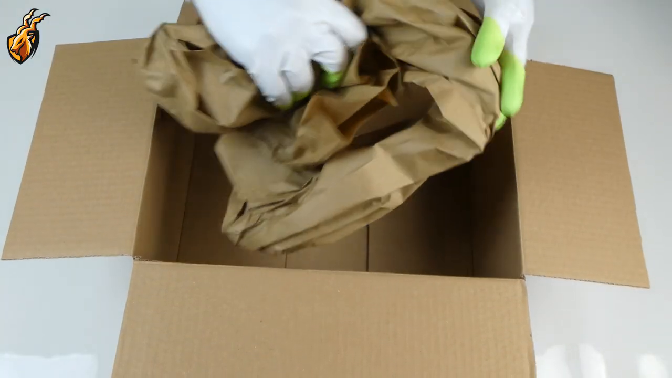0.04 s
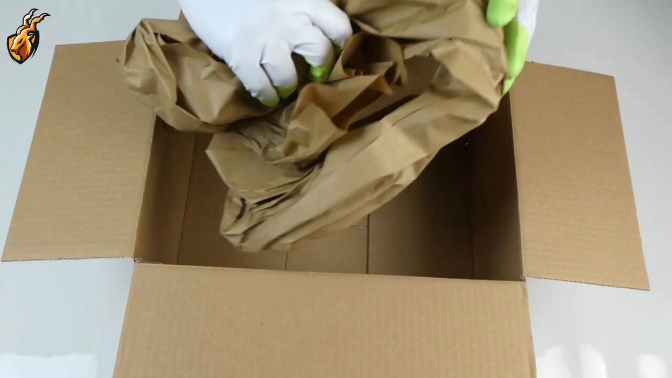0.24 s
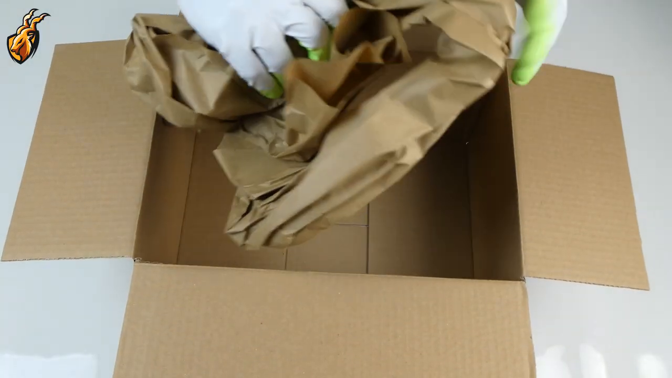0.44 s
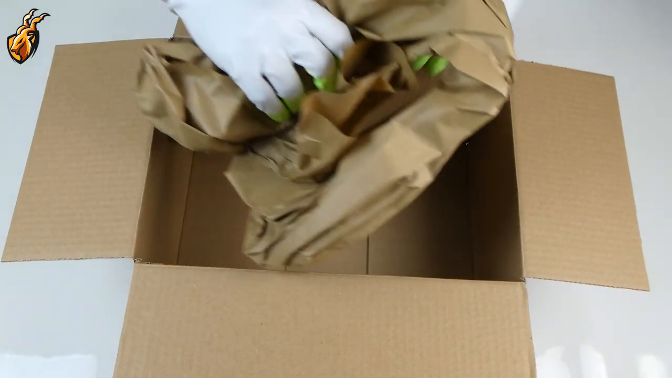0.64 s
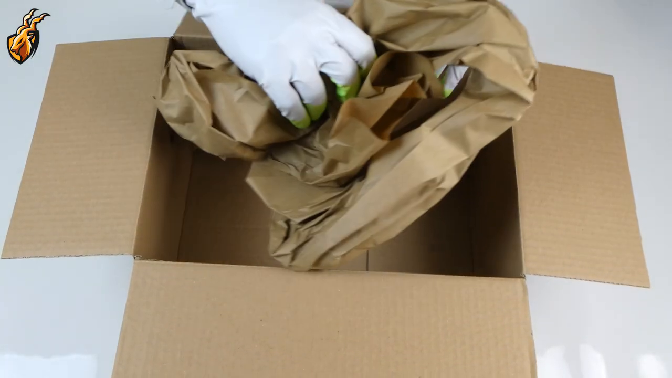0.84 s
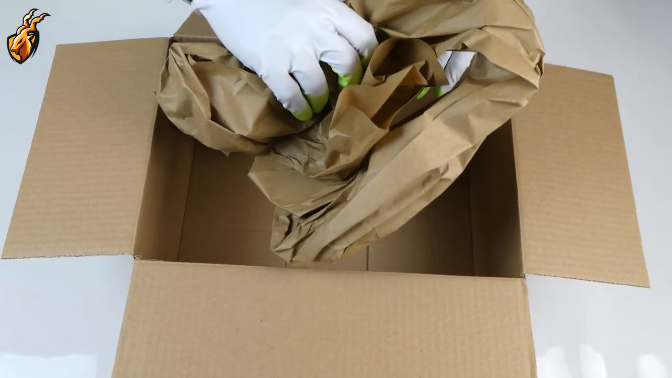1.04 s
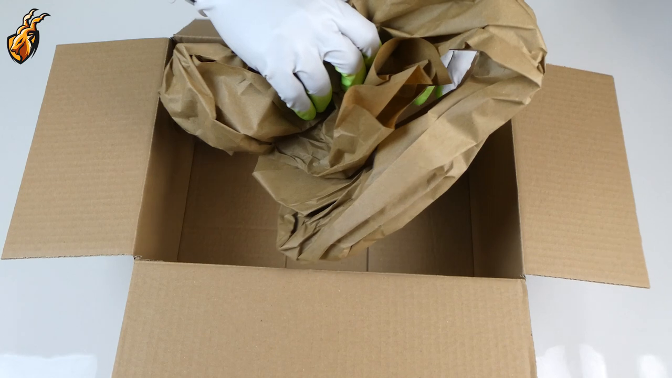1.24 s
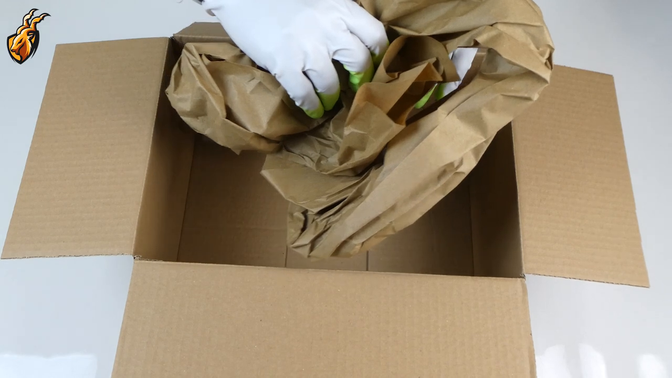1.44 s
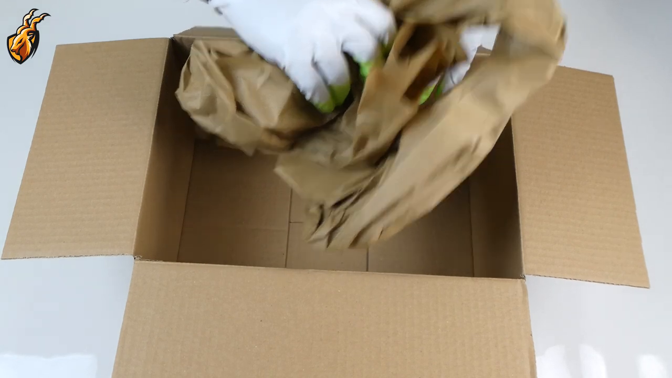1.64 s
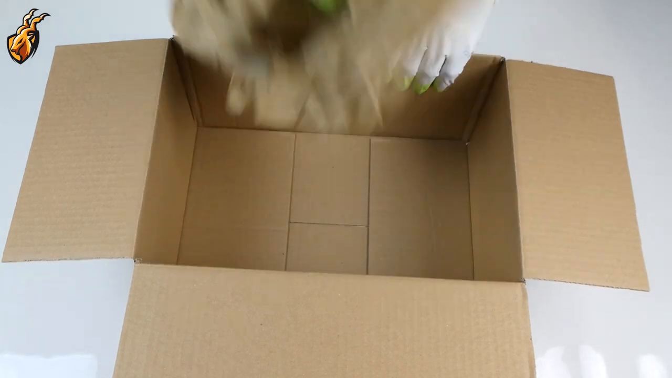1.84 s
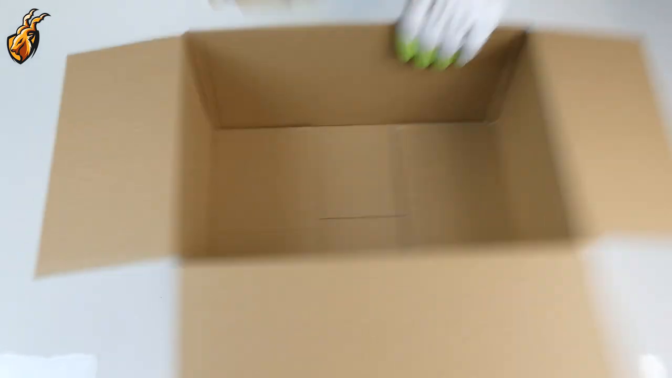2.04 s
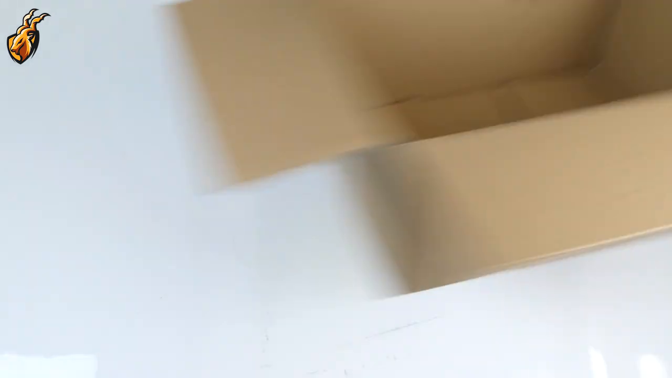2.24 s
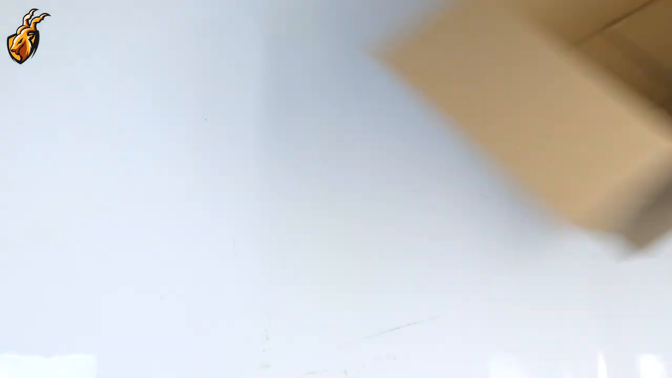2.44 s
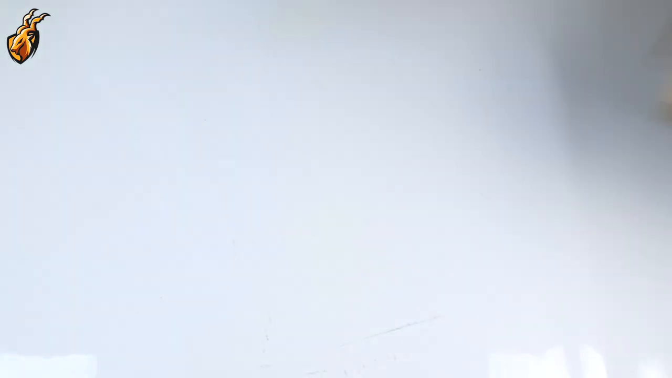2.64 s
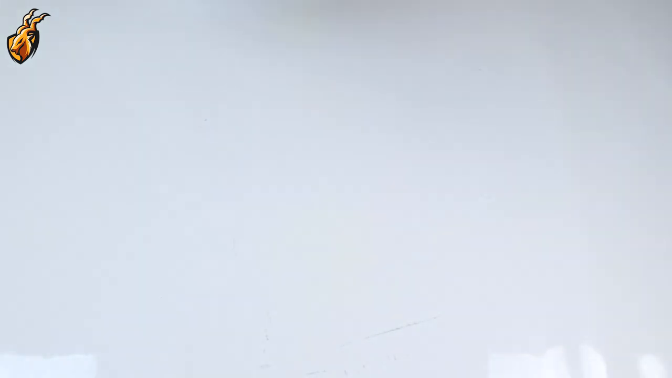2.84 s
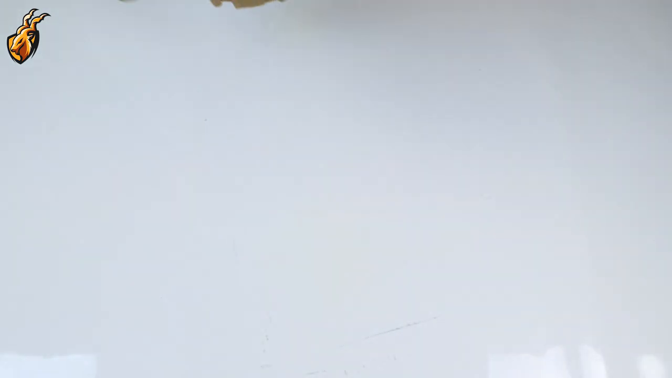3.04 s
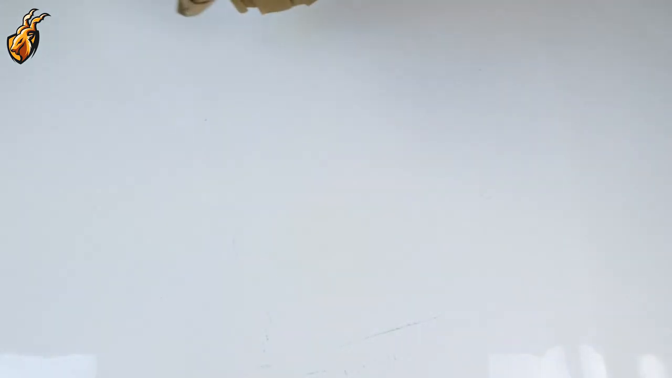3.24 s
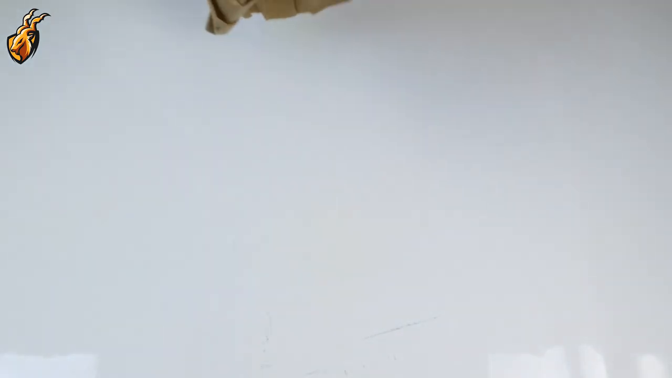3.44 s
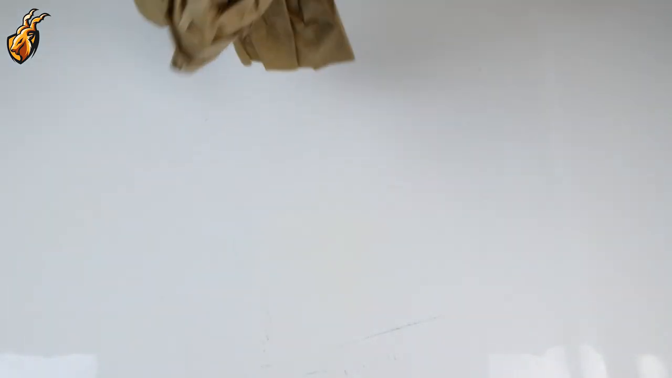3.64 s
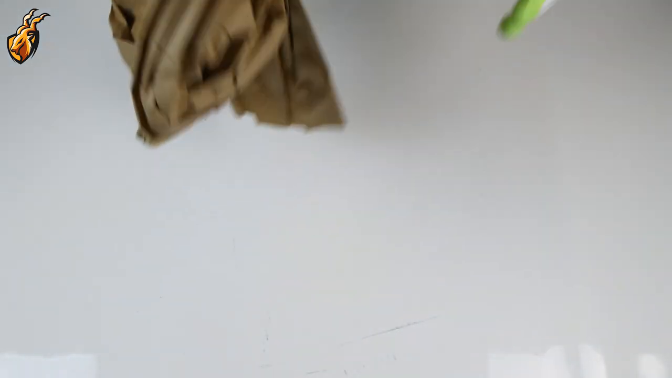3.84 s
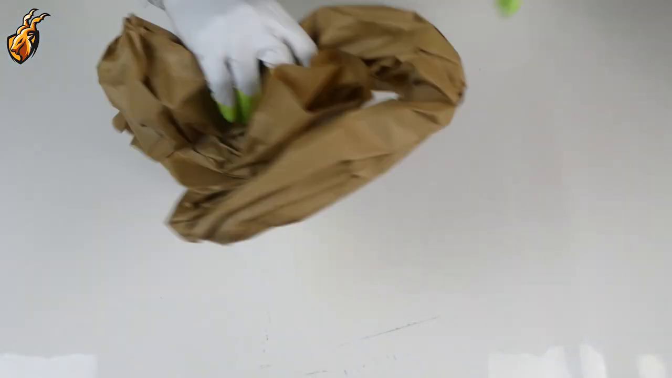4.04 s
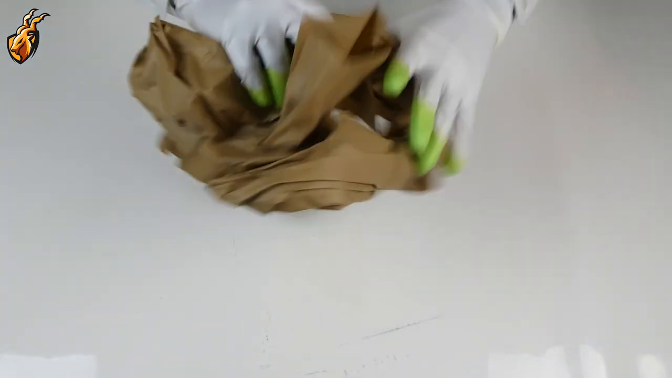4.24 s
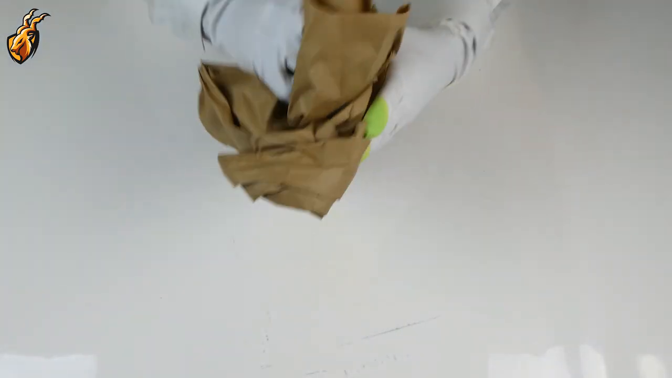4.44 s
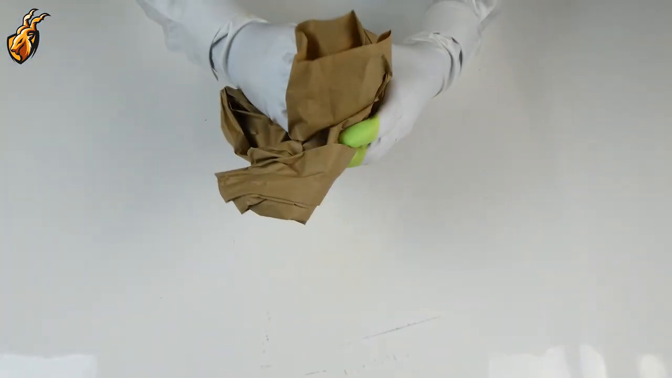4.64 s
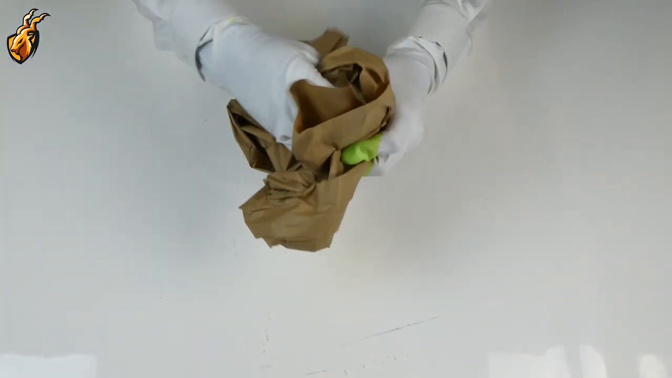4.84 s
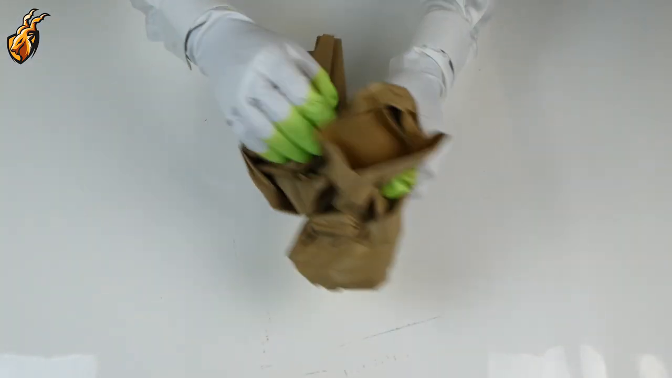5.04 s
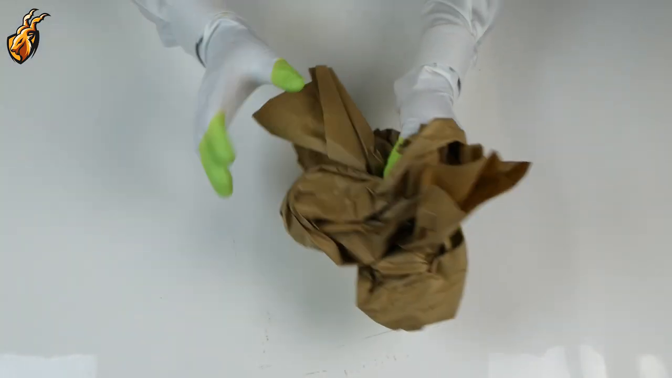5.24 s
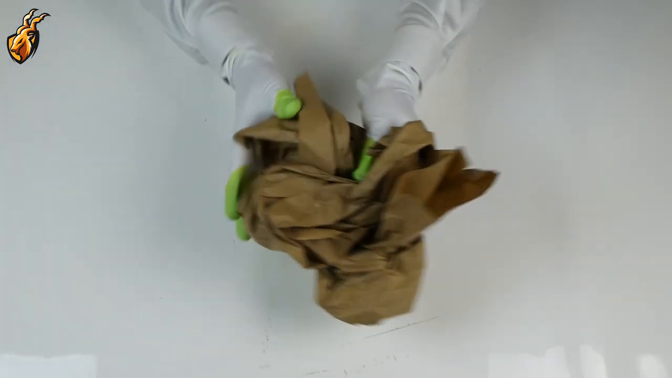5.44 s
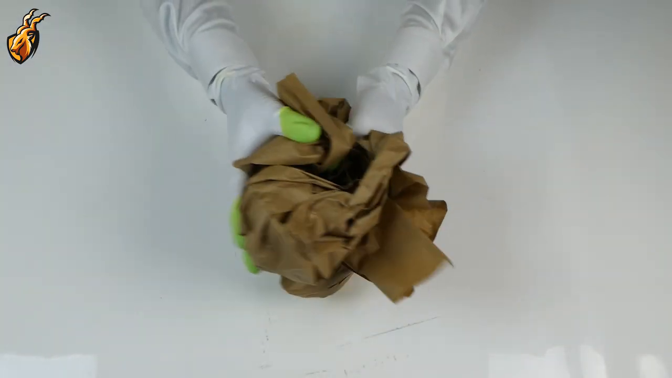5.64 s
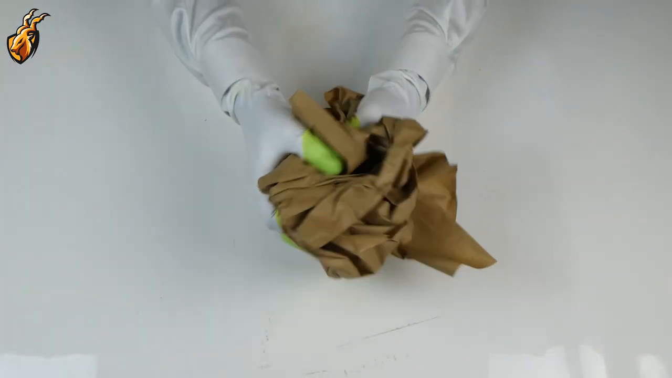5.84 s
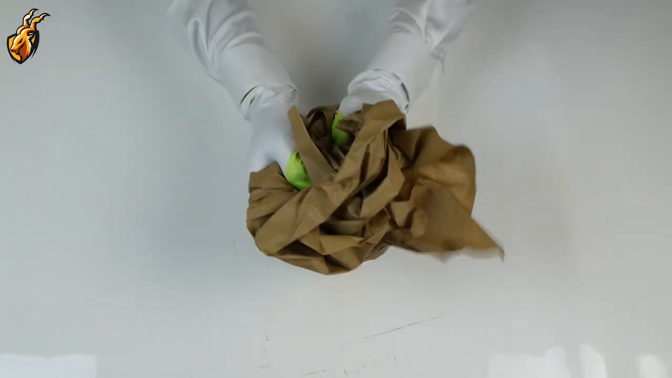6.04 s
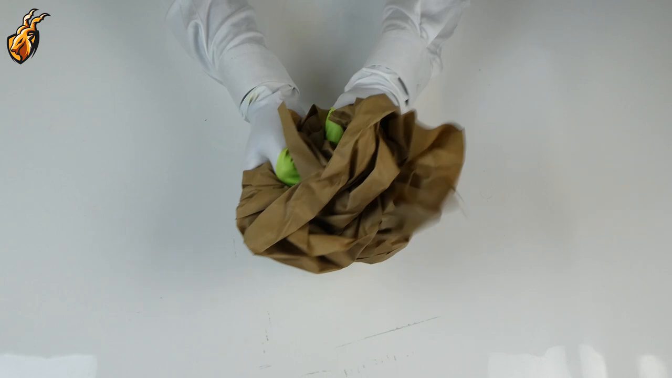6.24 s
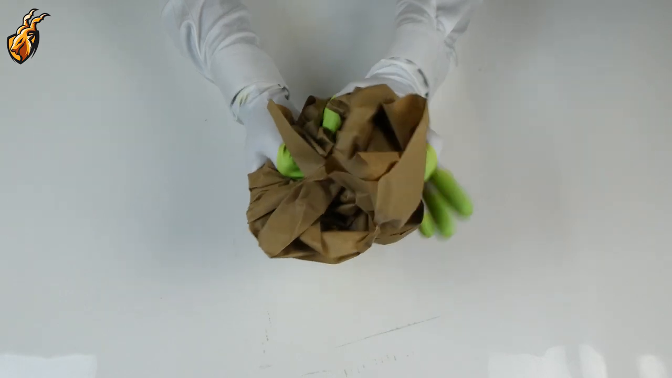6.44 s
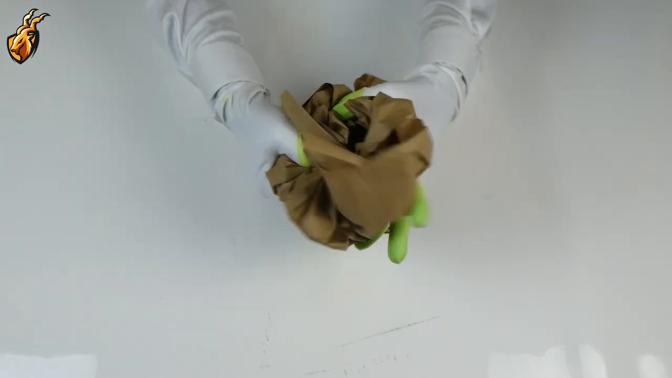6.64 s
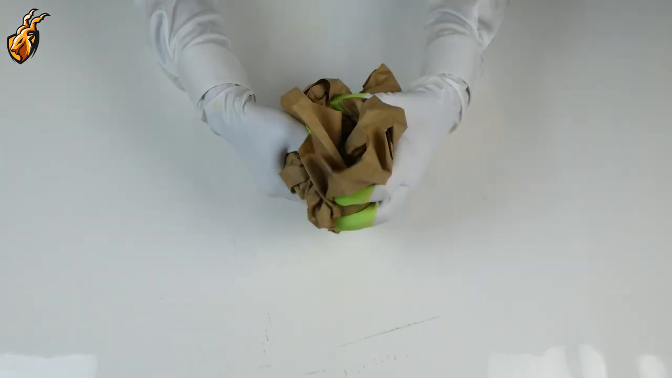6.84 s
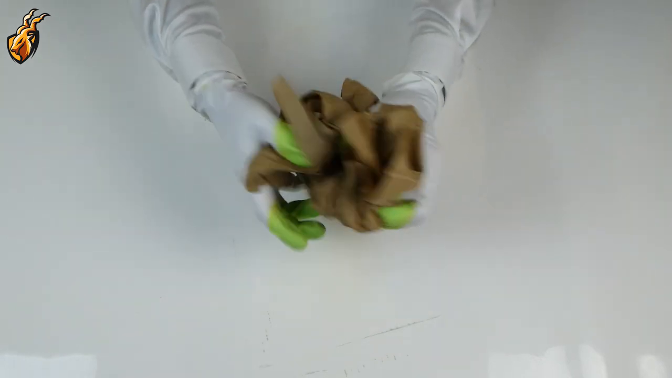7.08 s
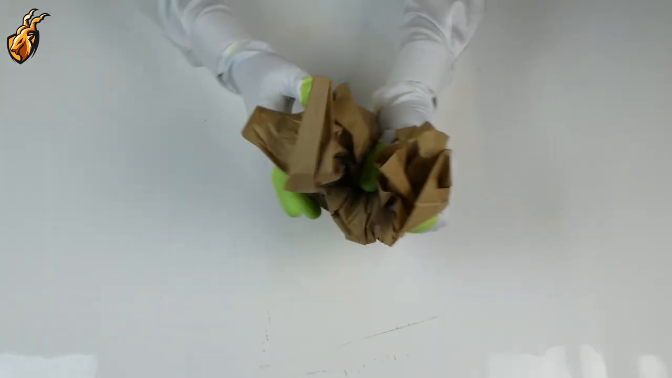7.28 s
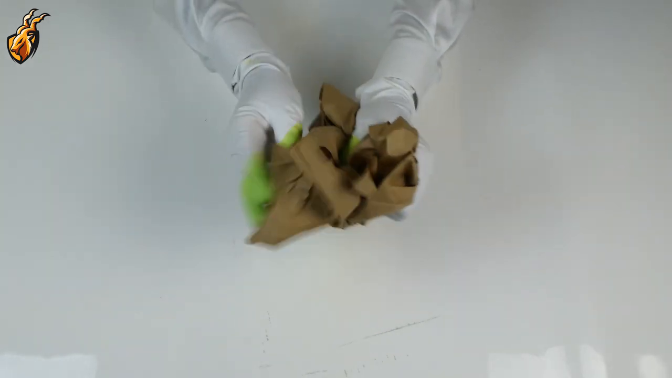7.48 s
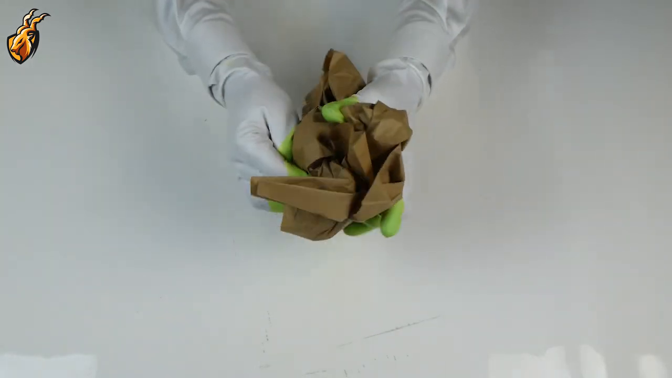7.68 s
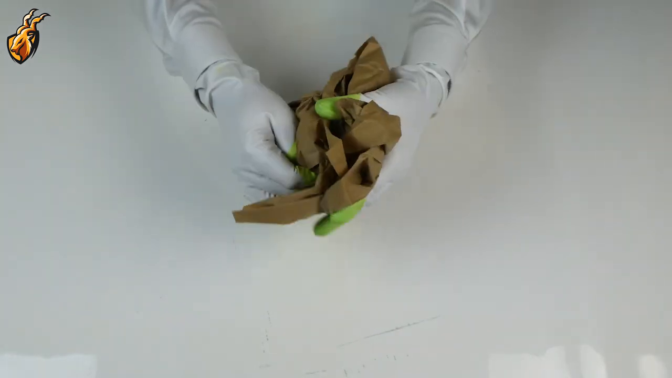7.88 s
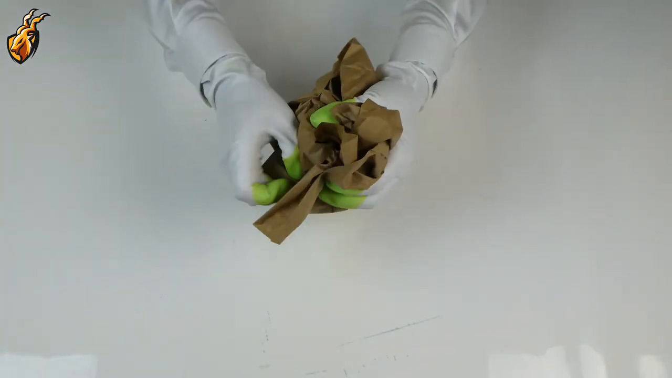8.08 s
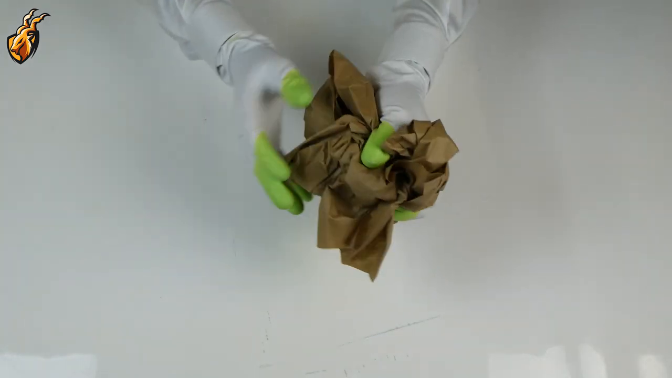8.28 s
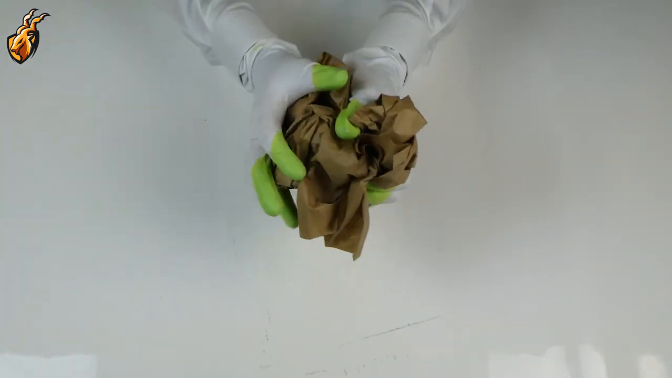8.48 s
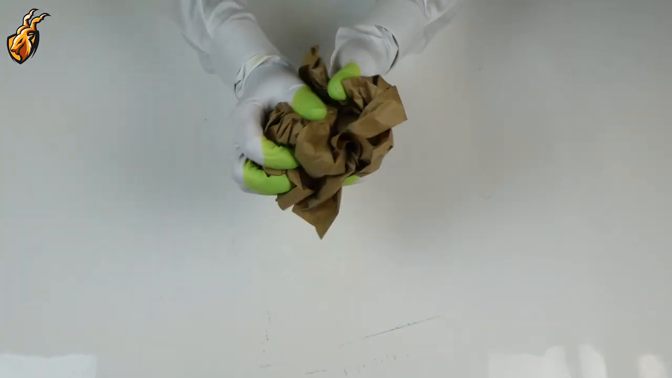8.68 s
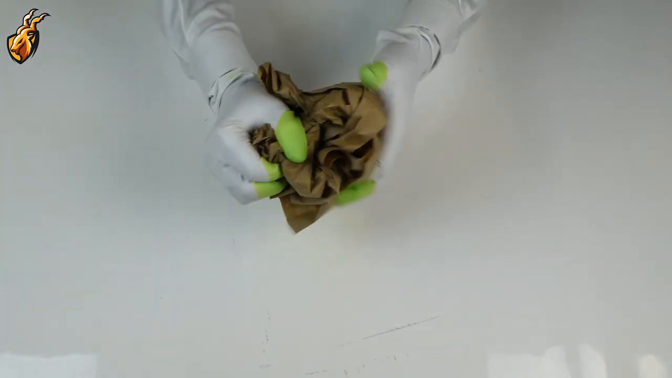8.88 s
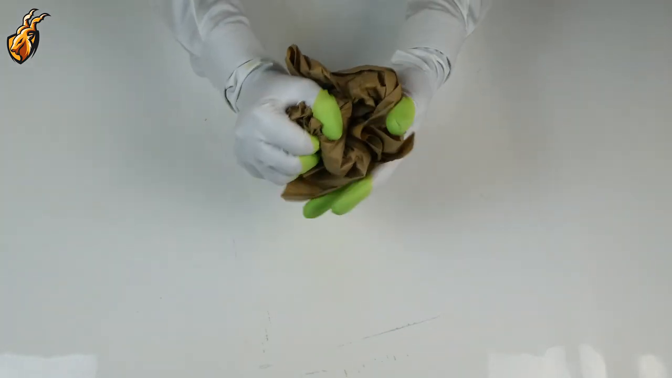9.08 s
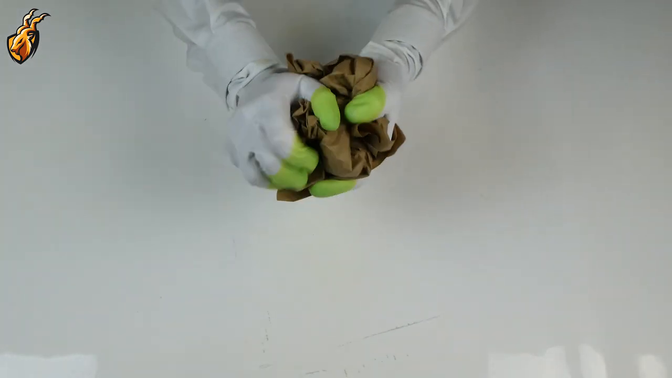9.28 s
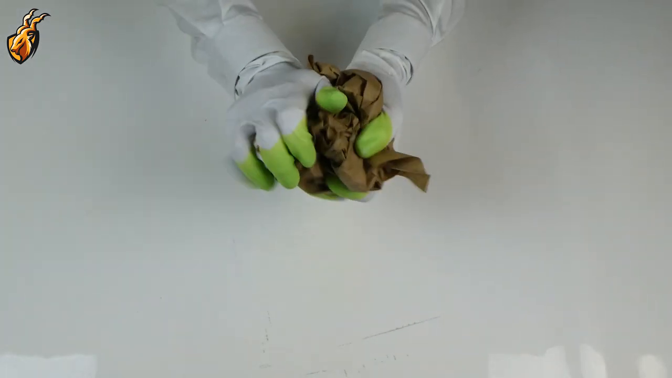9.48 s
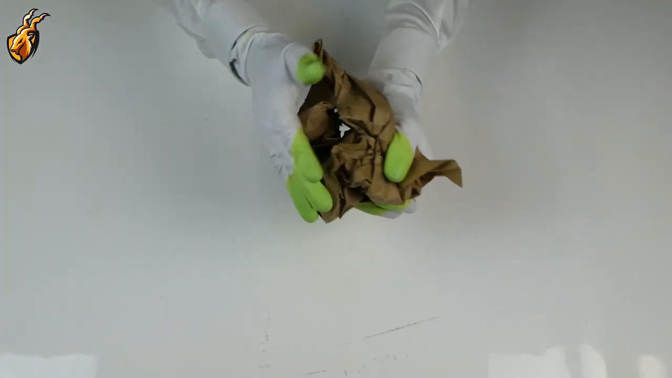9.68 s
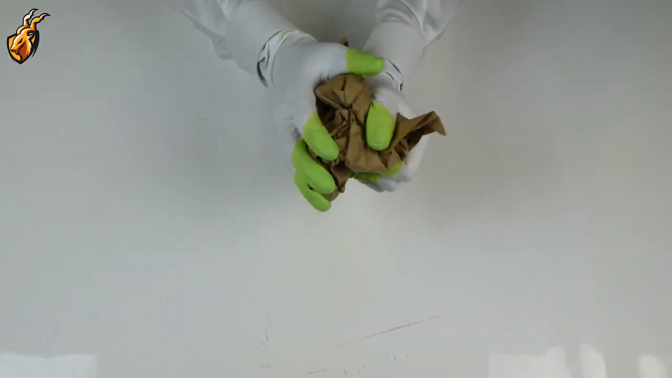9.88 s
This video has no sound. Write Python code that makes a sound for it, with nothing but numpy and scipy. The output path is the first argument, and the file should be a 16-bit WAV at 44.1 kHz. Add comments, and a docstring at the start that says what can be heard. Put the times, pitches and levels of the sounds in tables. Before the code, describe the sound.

Paper rustles against a hollow box, the box scrapes aside, and gloved hands scrunch the paper in bright, dense crinkles and snaps, close up.

```python
"""Kraft packing paper is crushed into a ball on a table, after gloved hands drag it out of a cardboard box.
Crushed paper buckles in thousands of tiny clicks and louder snaps, each snap shaking a facet of the sheet.
Before that, sliding paper hisses and rings the box, and the box is scraped aside with a low rumble and soft blows.
A small room and quiet air lie behind; the close microphone rings near 9 kHz and a limiter catches the sharpest snaps."""
import sys
import numpy as np
from scipy import signal
from scipy.fft import rfft, irfft, next_fast_len
from scipy.io import wavfile
from scipy.ndimage import uniform_filter1d, minimum_filter1d, map_coordinates

SR = 44100
rng = np.random.default_rng(int(sys.argv[2]) if len(sys.argv) > 2 else 0)


def master_out(mix):
    """Clip the mix to full scale and print it as 16-bit PCM to the path in sys.argv[1]."""
    frames = np.transpose(np.atleast_2d(mix))
    ceiling = np.clip(frames, -1, 1)
    pcm = np.round(ceiling * 32767).astype(np.int16)
    wavfile.write(sys.argv[1], SR, pcm)


N = 437472

# Steady crackle under the grip, which eases each time the hands take a new hold.
# Each row: time in seconds, crisp level in relative dB, body level in relative dB.
GRIP = [(4.187, -39, -39.5), (4.31, -15.5, -25.5), (4.6, -23.5, -34.5), (4.98, -25.5, -34),
        (5.05, -25.5, -39.5), (5.2, -49.5, -50.5), (5.3, -43, -47.5), (5.4, -38, -36.5), (5.45, -27, -36.5),
        (5.6, -22.5, -33), (6.13, -18.5, -29.5), (6.18, -30.5, -39), (6.72, -24, -35.5), (7.17, -21, -33),
        (7.36, -26.5, -39), (7.45, -22, -35.5), (8.03, -23, -33), (8.13, -27, -43.5), (8.43, -32.5, -41.5),
        (8.49, -22.5, -33.5), (8.9, -22, -34.5), (9.04, -32.5, -42.5), (9.33, -24, -35.5),
        (9.52, -30.5, -41.5), (9.6, -24.5, -36.5), (9.92, -22.5, -33.5)]
# Whole folds caving in, each a short swell of the crackle.
# Each row: start in seconds, length in seconds, crisp level in relative dB, body level in relative dB.
FOLDS = [(4.37, .14, -34, -53), (4.725, 0.092, -22.5, -32.5), (4.935, 0.048, -19, -31),
         (5.31, 0.017, -35, -41), (5.495, 0.022, -24, -48), (5.595, 0.054, -18.5, -38),
         (5.765, 0.019, -16, -28), (6.3, 0.13, -28, -35), (6.435, 0.0083, -24, -27.5),
         (6.515, 0.075, -22, -30), (6.67, 0.048, -20, -31), (6.79, 0.021, -17.5, -30),
         (7.1, 0.046, -18.5, -32), (7.265, 0.035, -21, -39), (7.4, 0.012, -16, -30),
         (7.668, 0.035, -19, -32.5), (7.975, 0.015, -20.5, -49), (8.14, 0.018, -26, -39),
         (8.27, 0.032, -25, -37.5), (8.455, 0.02, -24, -30), (8.635, 0.021, -23, -41),
         (8.93, 0.047, -19, -34.5), (9.09, 0.013, -16, -30), (9.15, 0.016, -25.5, -46),
         (9.35, 0.038, -22, -35), (9.545, 0.038, -27, -34.5), (9.63, 0.026, -20.5, -32)]
FOLD_ATTACK_S, FOLD_RELEASE_DB_PER_S = 0.0078, 364
CRUSH_START_S, CRUSH_END_S = GRIP[0][0], GRIP[-1][0]


def crush_levels():
    """Crisp and body dB of the squeezed paper: the grip's steady crackle plus the power of the caving folds."""
    grip = amp(curves(GRIP)) ** 2
    folds = swells(FOLDS, FOLD_ATTACK_S, FOLD_RELEASE_DB_PER_S)
    return 10 * np.log10(grip + folds)


# Colours of the crushed paper, its crisp top and its body.
# Each row: frequency in Hz, density in relative dB per Hz.
CRUSH_CRISP = [(2000, -35.5), (3500, -1.5), (5000, 2.5), (7000, 2.5), (9000, 2), (11500, -2), (15500, 1)]
CRUSH_BODY = [(30, -34), (100, -16.5), (200, -6), (450, -3), (1000, 2.5), (3000, 4), (4500, 1.5),
              (8000, -16)]


def crushing():
    """Buckles come in small avalanches over the hiss of rubbing folds, while wide facets flip with pitched ticks."""
    crisp_db, body_db = crush_levels()
    span = (CRUSH_START_S, CRUSH_END_S)
    clicks, rings = buckles(count=20000, span=span, spread_db=5, cap=2.93)
    activity = avalanches(per_s=170, spread_db=2.0, decay_s=0.00081, steady=0.82)
    wide_folds = avalanches(per_s=49, spread_db=9.0, decay_s=0.019, steady=1.3)  # stir the body only
    crisp = coloured(clicks + 0.8 * rng.standard_normal(N), CRUSH_CRISP) * amp(crisp_db - 7.5)
    body = coloured(rings + 2.11 * rng.standard_normal(N), CRUSH_BODY) * amp(body_db - 3.5)
    bed = activity * crisp + np.hypot(activity, wide_folds) * 0.78 * body
    flips = np.zeros(N)
    for ring in facets(count=700, centre_hz=3210, spread=0.46, cycles=2.5):
        add(flips, rng.uniform(*span), ring * amp(rng.uniform(-2.0, 0)))
    ticks = unit(flips) * amp(body_db - 9.5)
    return (bed + ticks) * (np.arange(N) >= CRUSH_START_S * SR)


# Lesser creases: rate, levels above the crackle of the moment, and random spread of those levels.
CREASE_PER_S, CREASE_CRACK_DB, CREASE_FACET_DB = 24, 10, -2
CRACK_SPREAD_DB, FACET_SPREAD_DB = 1, 7


def lesser_snaps(count=400):
    """Rows (s, crack dB, facet dB) of creases giving way by chance; their levels follow the crackle."""
    crisp_db, body_db = crush_levels()
    length_s = min(CRUSH_END_S, (N - 1) / SR) - CRUSH_START_S
    chance, scatter = rng.random(count), rng.standard_normal((count, 2))
    s = CRUSH_START_S + length_s * chance
    at = (s * SR).astype(int)
    crack_db = crisp_db[at] + CREASE_CRACK_DB + CRACK_SPREAD_DB * scatter[:, 0]
    facet_db = body_db[at] + CREASE_FACET_DB + FACET_SPREAD_DB * scatter[:, 1]
    return list(zip(s, crack_db, facet_db))[:int(CREASE_PER_S * length_s)]


# The clearest creases snapping through.
# Each row: start in seconds, crack level in relative dB, facet level in relative dB.
SNAPS = [(0.114, -13, -25), (0.1749, -8.5, -34), (0.2387, -20, -25.5), (0.3077, -36, -43),
         (0.494, -17.5, -34), (0.8034, -21, -49), (0.8218, -25, -31), (0.8785, -22, -22),
         (1.5015, -26.5, -36.5), (1.9483, -28, -52), (1.972, -27, -55), (2.5124, -41, -54),
         (2.5615, -36, -37), (3.096, -24.5, -43), (4.188, -28, -37), (4.2143, -5, -16.5), (4.2467, 6, -18),
         (4.2864, -4, -27), (4.3457, -3, -19), (4.5042, -1, -26), (4.5616, -5, -19), (4.61, -6, -30),
         (4.6425, -5, -33), (4.671, -5, -39), (4.8066, 8, -21), (4.9349, 3, -19.5), (4.9946, 3, -15),
         (5.0322, 5.5, -17), (5.0829, -5, -43), (5.178, -25, -26), (5.2244, -29, -28), (5.326, -18, -38),
         (5.3624, -2, -39), (5.3922, -17.5, -35), (5.4106, -13, -22), (5.4332, 5, -19), (5.497, 7, -21),
         (5.5125, -3, -22), (5.5385, -3, -37), (5.5675, -1, -37), (5.7008, 7, -17), (5.8684, -2, -17),
         (6.1274, -1, -29), (6.2145, -6, -23), (6.3561, -5, -13.5), (6.4676, -4, -37), (6.7212, -3, -35),
         (6.8287, 2, -14.5), (6.8462, -6, -40), (6.8827, -5, -29), (6.9058, -13, -37), (6.9273, -5, -38),
         (6.9922, 6, -18), (7.0492, 1, -32), (7.077, 3, -21), (7.1085, -11, -22), (7.153, -1, -14.5),
         (7.2042, -5, -30), (7.271, -3, -13.5), (7.281, 2, -16), (7.3245, -9, -41), (7.437, -2, -45),
         (7.488, -2, -38), (7.5437, 3, -18), (7.591, -1, -35), (7.7426, -7, -27), (7.8176, -2, -20),
         (7.8327, -2, -34), (7.9235, 2, -21), (7.9415, -4, -38), (7.9505, -5, -42), (7.9765, -2, -32),
         (7.9919, 5, -28), (8.0259, 1, -26), (8.0373, -1.5, -37), (8.0844, -6, -27), (8.1, -10, -43),
         (8.1232, -10, -32), (8.1838, -7, -44), (8.2395, -10, -48), (8.3215, -1, -29), (8.3896, -11, -48),
         (8.4012, -14, -22.5), (8.4462, -14, -27), (8.4605, -8, -17.5), (8.673, -9, -28), (8.7882, 7, -21),
         (8.8045, 1.5, -20), (8.824, -5, -16), (8.8605, -6, -19), (8.8768, -1, -20), (8.885, -4, -24),
         (8.9712, -4, -20.5), (9.008, -3, -44), (9.0354, -9.5, -28.5), (9.1035, -24, -24),
         (9.194, -7, -25.5), (9.2155, -6, -34), (9.2308, -6, -42), (9.2718, -6, -28), (9.287, -3, -23),
         (9.376, -6, -35), (9.4222, -13, -22), (9.4432, 8, -25), (9.5378, -4, -33), (9.7131, -6.5, -41),
         (9.7876, -7, -41)]


def snapping(rise_s=0.000094, crack_s=0.00055, second_db=-11, shiver_s=0.0032, facet_hz=2900, size=640):
    """A crease gives way in a quick slip and a second, usually weaker one; its facet shivers in a band of its own."""
    track, t = np.zeros(N), np.arange(size) / SR
    slip = (1 - np.exp(-t / rise_s)) * np.exp(-t / crack_s)
    for s, crack_db, facet_db in [*SNAPS, *lesser_snaps()]:
        lag_s, stiffness = rng.uniform(0.00019, 0.0022), rng.random()
        second_slip = amp(second_db + rng.normal(0, 3.5)) * np.interp(t - lag_s, t, slip)
        # a stiffer crease makes a thinner crack
        crease = signal.butter(2, [3500 + 3500 * stiffness, 15000], "band", fs=SR, output="sos")
        crack = signal.sosfilt(crease, (slip + second_slip) * rng.standard_normal(size))
        # cracks are levelled by their energy after the microphone
        add(track, s, amp(crack_db + 14.5) * crack / np.linalg.norm(capsule(crack)))

        hz = np.clip(facet_hz * np.exp(0.45 * rng.standard_normal()), 1700, 5000)
        facet = signal.butter(2, [hz / 1.71, hz * 1.61], "band", fs=SR, output="sos")
        shiver = signal.sosfilt(facet, rng.standard_normal(size) * np.exp(-t / shiver_s))
        add(track, s, amp(facet_db + 16.0) * shiver / np.linalg.norm(shiver))
    return track


# The long pull of the paper up the box wall.
# Each row: time in seconds, crisp level in relative dB, body level in relative dB.
PULL = [(0, -21.5, -28), (0.12, -23.5, -34.5), (0.21, -31.5, -38.5), (0.29, -43.5, -46), (0.34, -41.5, -44),
        (0.48, -35, -47), (0.62, -29.5, -43), (0.73, -31, -46), (0.84, -41, -44.5), (0.95, -37, -51.5),
        (1.07, -56, -64), (1.14, -75, -86)]
# Short brushes of the loose paper as it is lifted and shifted.
# Each row: start in seconds, length in seconds, crisp level in relative dB, body level in relative dB.
BRUSHES = [(1.165, 0.025, -61, -67), (1.21, 0.14, -62.5, -71.5), (1.365, 0.017, -58, -66),
           (1.497, 0.01, -41.5, -52), (1.55, 0.1, -58, -69), (1.66, 0.14, -52, -65),
           (1.815, 0.026, -56, -57), (1.90, .02, -57, -69), (1.942, 0.016, -44, -56),
           (2.08, 0.23, -73, -82), (2.508, .012, -66, -73.5), (2.559, 0.012, -55, -57),
           (2.97, .05, -70, -74.5), (3.022, 0.021, -55.5, -66.5), (3.092, 0.011, -50.5, -62),
           (3.195, .11, -50, -62.5), (3.23, 0.021, -43.5, -60), (3.315, 0.072, -38.5, -45.5),
           (3.418, 0.032, -38, -39), (3.84, .06, -65, -78), (3.903, 0.073, -56, -63),
           (3.995, 0.026, -49, -56)]
BRUSH_ATTACK_S, BRUSH_RELEASE_DB_PER_S = 0.0054, 272
SETTLE_DB, SETTLE_DB_PER_S = -11, 72  # after a brush the paper goes on settling


def slide_levels():
    """Crisp and body dB of the loose paper: one long pull, then brushes that settle slowly."""
    pull = amp(curves(PULL)) ** 2 * (np.arange(N) < PULL[-1][0] * SR)
    brushes = swells(BRUSHES, BRUSH_ATTACK_S, BRUSH_RELEASE_DB_PER_S)
    settling = amp(SETTLE_DB) ** 2 * swells(BRUSHES, BRUSH_ATTACK_S, SETTLE_DB_PER_S)
    return 10 * np.log10(pull + brushes + settling + 1e-20)


# Colours of the sliding paper, its crisp top and its body.
# Each row: frequency in Hz, density in relative dB per Hz.
SLIDE_CRISP = [(2000, -26.5), (3500, -9), (5000, -2.5), (8000, -3.5), (11500, -3), (15500, -5.5)]
SLIDE_BODY = [(30, 0.5), (120, -8.5), (300, -1), (1000, 0.5), (3000, 0.5), (4500, -5), (8000, -38)]


def sliding():
    """Friction hiss that catches and slips, with a little crackle mixed in."""
    crisp_db, body_db = slide_levels()
    clicks, rings = buckles(count=2000, span=(PULL[0][0], CRUSH_START_S), spread_db=2, cap=4)
    catch_and_slip = avalanches(per_s=50, spread_db=5.5, decay_s=0.006, steady=1.0)
    crisp = coloured(rng.standard_normal(N) + 0.5 * clicks, SLIDE_CRISP) * amp(crisp_db - 10.5)
    body = coloured(rng.standard_normal(N) + 0.5 * rings, SLIDE_BODY) * amp(body_db - 4.0)
    return catch_and_slip * (crisp + body) * (np.arange(N) < CRUSH_START_S * SR)


# Paper rubbing the box wall while it is inside.
# Each row: time in seconds, level in relative dB.
WALL_RUB = [(0, -43), (0.11, -37.5), (0.29, -50.5), (0.7, -44.5), (0.86, -50), (1.02, -53.5), (1.13, -74),
            (1.24, -65), (1.39, -64), (1.46, -86), (1.52, -63), (1.98, -61), (2.25, -95)]
# The hollow of the open box.
# Each row: resonance in Hz, width of one filter pass in Hz, level in relative dB.
HOLLOW = [(153.6, 37, -20), (434, 240, -11.5), (978, 120, -8)]
RUB_WAVER_DB, RUB_WAVER_PER_S = 3.5, 15


def box_ringing():
    """Rubbing noise rings the open box; the contact wanders, so each resonance comes and goes."""
    hollow = np.zeros(N)
    for centre, width, db in HOLLOW:
        def resonance(f):
            once = 1j * f * width / (centre ** 2 - f ** 2 + 1j * f * width)
            return once ** 2  # two passes
        waver = amp(db + RUB_WAVER_DB * wobble(RUB_WAVER_PER_S))
        hollow += waver * unit(filtered(rng.standard_normal(N), resonance))
    rub, = amp(curves(WALL_RUB))
    return hollow * rub * (np.arange(N) < WALL_RUB[-1][0] * SR)


# The box pushed aside. Each row: time in seconds, rumble level in dB.
DRAG = [(3.23, -85), (3.245, -56), (3.37, -49), (3.39, -36), (3.46, -38.5), (3.52, -53), (3.62, -67),
        (3.85, -85)]
# Colour of its panels. Each row: frequency in Hz, density in relative dB per Hz.
BOARD = [(25, -4), (60, -13), (100, -5), (135, 9), (175, -11.5), (330, -13), (600, -23), (1500, -60)]


def dragging():
    """The empty box scrapes to rest: low noise in the colour of its rumbling panels."""
    rumble_db, = curves(DRAG)
    moving = (np.arange(N) > DRAG[0][0] * SR) & (np.arange(N) < DRAG[-1][0] * SR)
    return moving * amp(rumble_db) * coloured(rng.standard_normal(N), BOARD)


# Soft blows on the box and the table.
# Each row: start in seconds, thud level in relative dB, knock level in relative dB.
BUMPS = [(0.06, -39, -58), (0.22, -45, -53), (0.801, -38.5, -46.5), (0.845, -41, -52), (1.829, -49, -50),
         (1.969, -45, -55.5), (3.236, -49, -48), (3.424, -40, -63), (4.199, -51, -45.5), (4.339, -43, -56),
         (4.74, -49, -64), (5.47, -43.5, -40.5), (6.605, -47, -44), (8.86, -57, -66), (9.645, -49, -43)]
# Colour of the thud. Each row: frequency in Hz, density in relative dB per Hz.
THUD = [(25, -5.5), (45, -11), (70, 6), (105, -10.5), (150, 4.5), (185, 0.5), (260, -31), (600, -51)]


def bumping(attack_s=0.0022, thud_t60=0.18, knock_t60=0.18):
    """Each soft blow gives a dull low thud and a short woody knock, both bursts of dying noise."""
    thuds, knocks, t = np.zeros(N), np.zeros(N), np.arange(SR // 2) / SR
    attack = 1 - np.exp(-t / attack_s)
    for s, thud_db, knock_db in BUMPS:
        add(thuds, s, attack * amp(thud_db + 0.5 - 60 * t / thud_t60))
        add(knocks, s, attack * amp(knock_db + 1.5 - 60 * t / knock_t60))
    thud_noise = coloured(rng.standard_normal(N), THUD)
    wood = signal.butter(2, [230, 520], "band", fs=SR, output="sos")
    knock_noise = unit(signal.sosfilt(wood, rng.standard_normal(N)))
    return thuds * thud_noise + knocks * knock_noise


# Decay of the small room. Each row: frequency in Hz, time to fall 60 dB in seconds.
ROOM = [(150, 0.63), (500, 0.57), (3000, 0.2), (10000, 0.08)]


def room(x, size=8192):
    """The walls' answer: each frequency dies at its own speed, with fresh echo paths for every block."""
    wet = np.zeros(N)
    for start in range(0, N, size):
        hz, t, z = signal.stft(rng.standard_normal(SR // 2), SR, nperseg=256)
        decay = amp(-60 * t / along(ROOM, hz)[:, None])
        tail = signal.istft(z * decay, SR, nperseg=256)[1]
        tail = tail * (1 - np.exp(-np.arange(len(tail)) / SR / 0.0021))  # soft onset
        add(wet, start / SR, signal.fftconvolve(x[start:start + size], tail / np.linalg.norm(tail)))
    return wet


# Colour of the room's air. Each row: frequency in Hz, density in relative dB per Hz.
AIR = [(25, 13.5), (70, -1), (150, 5), (300, -4), (1000, -21.5), (4000, -18.5), (15000, -34)]


def room_air():
    """Steady, quiet coloured noise."""
    return amp(-74.0) * coloured(rng.standard_normal(N), AIR)


def buckles(count, span, spread_db, cap):
    """Tiny buckles scattered over a span, most weak and a few strong: their clicks and their facet rings."""
    at = rng.integers(int(span[0] * SR), min(int(span[1] * SR), N), count)
    strength_db = spread_db * np.minimum(rng.exponential(size=count), cap)
    strength = amp(strength_db) * rng.choice([-1, 1], count)
    strength = unit(strength) * np.sqrt((span[1] - span[0]) * SR / count)  # clicks near rms 1 over the span
    rings = strength[:, None] * facets(count)
    where = at[:, None] + np.arange(rings.shape[1])
    clicks = np.bincount(at, strength, N)
    return clicks, np.bincount(where.ravel(), rings.ravel(), N)[:N]


def facets(count, centre_hz=2000, spread=0.82, cycles=0.62, size=256):
    """Rows of brief rings of equal energy: each paper facet has its own pitch."""
    hz = np.clip(centre_hz * np.exp(spread * rng.standard_normal((count, 1))), 500, 7000)
    turns = hz * np.arange(size) / SR
    rings = np.cos(2 * np.pi * turns) * np.exp(-turns / cycles) * np.linspace(1, 0, size)
    rings[:, 0] /= 2  # a softer first sample leaves less bass
    return rings / np.linalg.norm(rings, axis=1, keepdims=True)


def avalanches(per_s, spread_db, decay_s, steady, size=2048):
    """Buckling activity, rms 1: its power jumps when a fold gives way and dies down in milliseconds."""
    chance, draw = rng.random(N), rng.exponential(size=N)
    starts = (chance < per_s / SR) * amp(spread_db * np.minimum(draw, 2.4)) ** 2
    decay = np.exp(-np.arange(size) / SR / decay_s)
    power = np.abs(signal.oaconvolve(starts, decay)[:N])
    return unit(np.sqrt(steady + power / power.mean()))


def swells(rows, attack_s, release_db_per_s):
    """Crisp and body power of separate movements: each rises, holds until its length is up and dies away."""
    power, t = np.zeros((2, N)), np.arange(SR) / SR
    for s, length_s, *levels_db in rows:
        release = amp(-release_db_per_s * np.maximum(t - length_s, 0))
        shape = np.minimum(t / attack_s, 1) * release
        for track, db in zip(power, levels_db):
            add(track, s, (amp(db) * shape) ** 2)
    return power


def amp(db):
    """Decibels to gain."""
    return 10 ** (np.asarray(db) / 20)


def unit(x):
    """Scale to rms 1."""
    return x / np.sqrt(np.mean(x ** 2) + 1e-20)


def along(points, hz):
    """Read (Hz, value) points on a log frequency axis."""
    f, v = np.transpose(points)
    return np.interp(np.log(hz + 1), np.log(f + 1), v)


def curves(rows):
    """One value per sample for each column after the time."""
    s, *cols = np.transpose(rows)
    return [np.interp(np.arange(N) / SR, s, c) for c in cols]


def wobble(rate):
    """A random curve of straight lines between rate knots a second."""
    knots = rng.standard_normal(int(N * rate / SR) + 4)
    return map_coordinates(knots, [np.arange(N) * rate / SR], order=1)


def add(track, s, sound):
    """Mix a sound into the track at s seconds."""
    start = int(np.clip(round(s * SR), 0, N - 1))
    track[start:start + len(sound)] += sound[:N - start]


def filtered(x, response):
    """Multiply the spectrum of x by a response of frequency."""
    m = next_fast_len(N + SR // 2)
    return irfft(rfft(x, m) * response(np.fft.rfftfreq(m, 1 / SR)), m)[:N]


def coloured(x, spectrum, size=4096):
    """Send x through a causal (minimum-phase) filter of the given colour, at rms 1."""
    cepstrum = irfft(np.log(amp(along(spectrum, np.fft.rfftfreq(size, 1 / SR)))))
    cepstrum[1:size // 2] *= 2  # fold the cepstrum forward in time
    cepstrum[size // 2 + 1:] = 0
    impulse = irfft(np.exp(rfft(cepstrum)))
    return unit(signal.oaconvolve(x, impulse)[:N])


def capsule(x, hz=9150, width_hz=1250):
    """The microphone: flat in the bass, with one strong treble resonance from a pole pair."""
    r = np.exp(-np.pi * width_hz / SR)
    poles = [1, -2 * r * np.cos(2 * np.pi * hz / SR), r * r]
    return signal.lfilter([sum(poles)], poles, x)


def scene():
    """Paper and box close by, the room and its quiet air behind."""
    air = room_air()
    paper = crushing() + snapping() + sliding()
    box = box_ringing() + dragging() + bumping()
    near = paper + box
    return (near + amp(-16) * room(near) + air)[None]


TOP_HZ = 15900


def record(dry, top=0.86, size=32):
    """The capsule rings, a fast limiter holds the sharpest snaps near top, then a steep low-pass cuts the treble."""
    x = capsule(dry[0])
    needed = top / np.maximum(np.abs(x), top)
    gain = uniform_filter1d(minimum_filter1d(needed, size), size)
    # the cut slopes over 300 Hz around TOP_HZ
    return filtered(x * gain, lambda hz: np.clip((TOP_HZ - hz) / 300 + 0.5, 0, 1))[None]


dry = scene()
out = record(dry)
master_out(out)
```